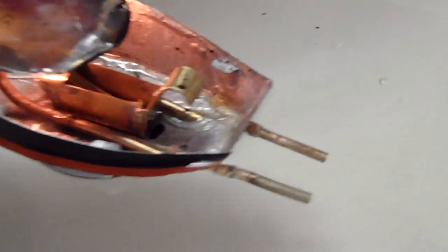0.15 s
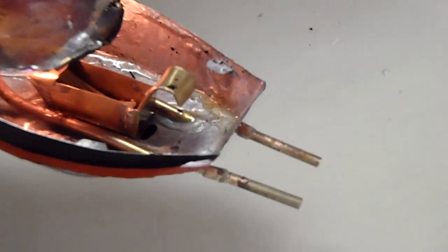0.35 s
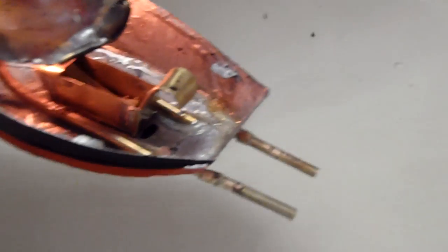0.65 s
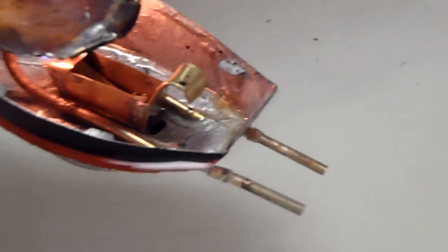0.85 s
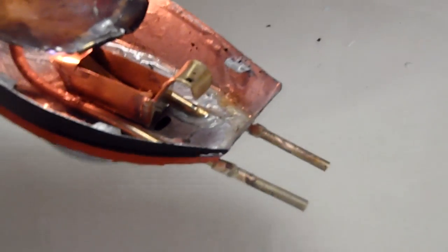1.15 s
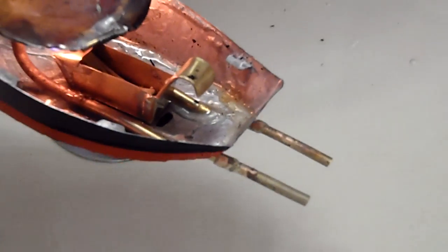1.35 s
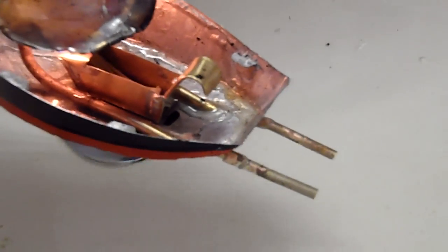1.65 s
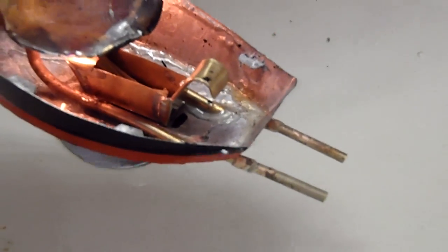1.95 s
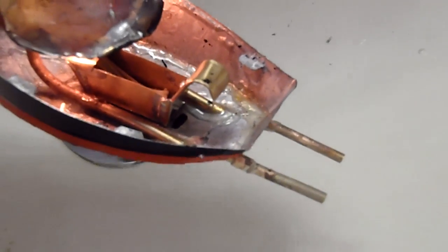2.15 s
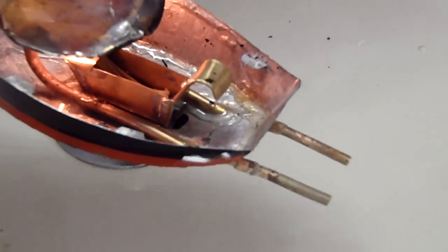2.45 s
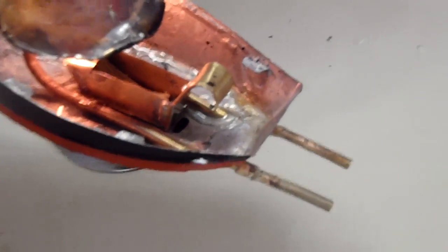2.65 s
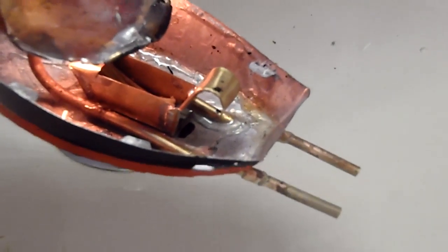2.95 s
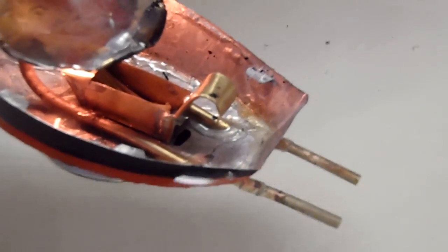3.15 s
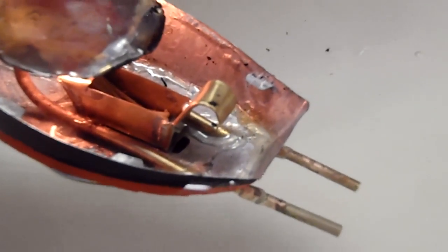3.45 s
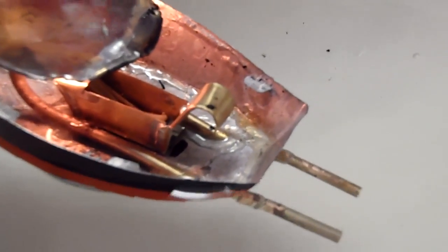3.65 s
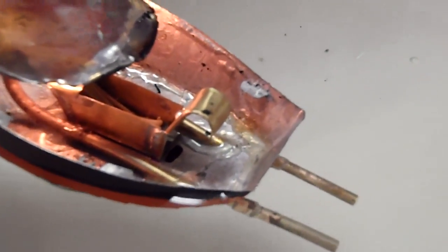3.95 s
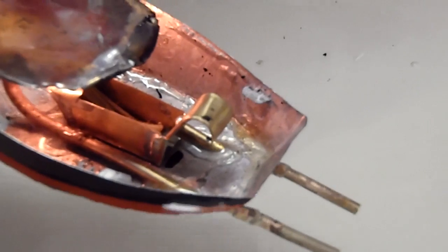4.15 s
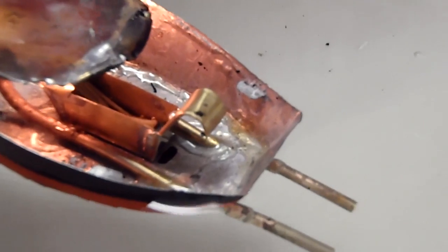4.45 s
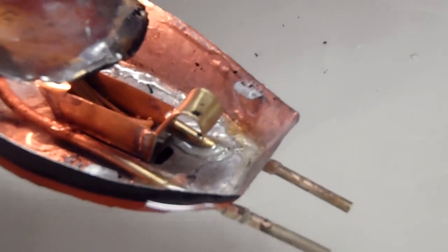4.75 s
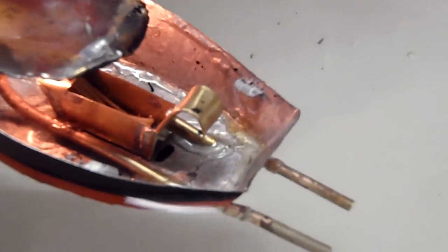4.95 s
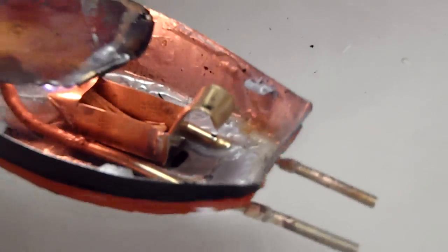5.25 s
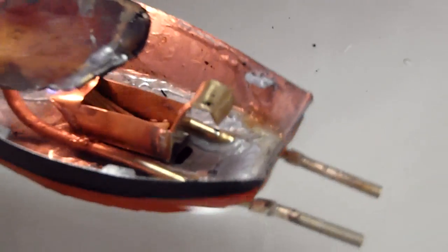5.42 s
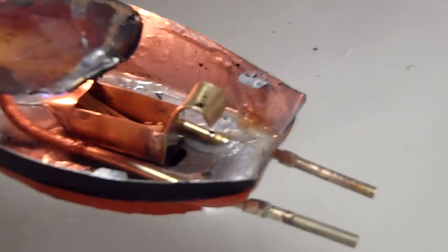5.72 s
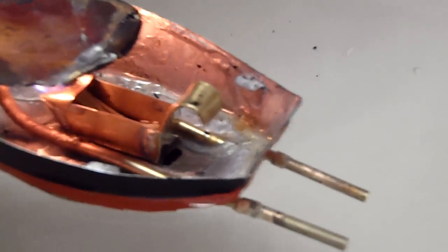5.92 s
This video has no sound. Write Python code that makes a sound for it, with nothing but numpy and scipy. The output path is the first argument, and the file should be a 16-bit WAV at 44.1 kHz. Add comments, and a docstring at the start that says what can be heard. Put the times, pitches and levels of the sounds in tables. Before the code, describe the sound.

Fast, even metallic popping from the boiler of a flame-heated toy boat on water, over a faint hiss.

```python
"""Toy steam boat in a basin

A flame-heated boiler drives a relaxation oscillation, about twelve cycles a second: steam snaps
the thin lid outward (bright), condensation sucks it back (dull). Each snap excites the normal modes
of lid and hull, and the basin reverberates. The timbre shifts as the boat drifts and, near the end,
turns. Two faint thumps and a steady hiss lie beneath."""
import sys
import numpy as np
from scipy import signal
from scipy.fft import rfft, irfft
from scipy.io import wavfile

SR = 44100
rng = np.random.default_rng(int(sys.argv[2]) if len(sys.argv) > 2 else 0)


def store_pcm(level_fs):
    """Save levels as 16-bit WAV."""
    pcm = np.round(np.clip(level_fs, -1, 1) * 32767).astype(np.int16)
    wavfile.write(sys.argv[1], SR, np.atleast_2d(pcm).T)


N = 268285
SIZE, LEAD = 8192, 128  # samples: one snap's transform, its soft run-in
HZ, T = np.fft.rfftfreq(SIZE, 1 / SR), np.arange(SIZE) / SR
SNAP_DB, DRIFT_DB, TURN_DB = (-26.5, -28.5), (0.14, -.5), (0.76, -0.14)  # each (outward, inward)
TURN_S, TURN_TAKES_S = 5.12, 0.065

# Drift of the boat past the listener: t/s, position (about -1 to 1)
POSITION = [(0, -0.95), (1.2, -1.07), (1.7, -0.37), (3.4, 0.11), (4, 0.39), (4.6, 1.1), (5.12, 0.92),
            (5.2, -0.16), (5.7, -0.07), (6.08, -0.94)]
def snaps(s, inward, rattle_db, rattle_t60, shudder_t60):
    """Snap-through buckling: at each time in s the lid flips, an impulse that rings lid and hull."""
    drift = follow(s, POSITION)
    turned = follow(s, [(TURN_S, 0.29), (TURN_S + TURN_TAKES_S, 1)])
    level_db = SNAP_DB[inward] + DRIFT_DB[inward] * drift + TURN_DB[inward] * turned
    level_db += 0.39 * rng.standard_normal((len(s), 1))
    gain = resonances(s, inward, drift, turned) * antiresonances(inward, turned)
    pitch = 1.0043 + 0.0036 * wandering(s, 1, 0.298)  # the hot lid's tension creeps
    gain = np.array([np.interp(HZ / p, HZ, g) for p, g in zip(pitch, gain)])
    blow = shuddering_blow(s, inward, shudder_t60)
    body = minimum_phase(gain / np.hypot(abs(blow), 0.75))  # evens out the blow's colour
    rattle = rng.standard_normal((len(s), SIZE)) * gain_of(-60 * T / rattle_t60)
    attack = dispersion(inward) + gain_of(rattle_db) * unit_spectrum(rattle)
    rings = -irfft(body * blow * attack)
    rings = np.roll(rings, LEAD, axis=1)[:, :SIZE // 2]
    damping_db_per_s = 700 * (0.5 - 0.66 * turned)  # water damps the tail; the turn prolongs it
    rings *= gain_of(-damping_db_per_s * np.maximum(T[:SIZE // 2] - .02, 0))
    rings *= signal.windows.tukey(SIZE // 2, 2 * LEAD / SIZE)
    rings *= gain_of(level_db) / rings[:, LEAD:LEAD + 460].std(1)[:, None]  # rms of the first 10 ms
    out = np.zeros(N)
    for when, ring in zip(s, rings):
        add(out, when - LEAD / SR, ring)
    return out


# Boiler cycle, varying with its heat: t/s, period/ms
PERIOD = [(.06, 84.24), (.23, 84.06), (1.83, 84.87), (2.43, 85.97), (2.77, 85.92), (3.81, 87.25),
          (3.99, 87.01), (4.42, 87.1), (4.85, 86.2), (4.94, 86.36), (5.2, 86.43), (5.37, 88.81),
          (5.55, 87.03), (5.73, 87.89), (5.9, 84.17), (5.98, 84.23)]
# Condensation pulls the lid in: t/s, delay after the outward snap/ms
CONDENSATION = [(0, 39.6), (.25, 38.6), (.9, 38), (1.8, 37.6), (4.2, 37.6), (4.9, 36.8), (5.45, 37.6),
                (5.8, 36.7), (6, 35.7)]
def strokes(first_s=.0591):
    """Relaxation oscillation: boiling and condensation time the outward and inward snaps."""
    outward = [first_s - PERIOD[0][1] / 1000]
    while outward[-1] < N / SR:
        outward.append(outward[-1] + follow(outward[-1:], PERIOD).item() / 1000)
    outward = np.array(outward)
    inward = outward + follow(outward, CONDENSATION)[:, 0] / 1000
    return outward[1:-1], inward[:-2]


# Modes of lid and hull: nominal f/Hz, uncapped t60/s, relative level/dB in four columns
# (outward, inward, outward once turned, inward once turned)
MODES = [ (430.8, 0.054, 5.5, 9.5, 5.5, 8), (537.6, 0.066, 3, 9, 3.5, 7.5), (650, 0.061, 6, 12, 6, 14.5),
         (788, 0.018, 8, 19.5, 10, 11), (896, 0.096, -9, -5, -2, 20), (1036, 0.021, 13.5, 13, 15, 5.5),
         (1080.5, 0.064, 10, 14.5, 21, 18), (1229, 0.013, 17, 5, 13.5, 9), (1527, 0.034, 19, -33, 17, 20),
         (1733, 0.016, 13.5, 9.5, 11, 7), (2066, 0.033, 11.5, 3, 12, -6), (2290, 0.094, 9.5, -15, 9, -3),
         (2400, 0.055, 13, 1, -9, -10), (2535, 0.025, 7.5, 7, 9.5, 2), (2820, 0.064, 13, -34, 3, -17),
         (2996, 0.013, 13, -3, 9, -12), (3286, 0.054, -72, -12.5, 16, -3),
         (3594, 0.0076, 11.5, -7.5, 8, -28), (3836, 0.069, 8.5, -6.5, -5, -11),
         (3979, 0.042, 7.5, -25, 14.5, -37), (4130, 0.062, -15.5, -61, -10, -2),
         (4323, 0.042, 4.5, -6, 14.5, -16), (4504, 0.069, 4, -8, 0, -4.5), (4694, 0.012, 7, -4, 7.5, -22),
         (4934, 0.016, 11.5, -22, 3, -13), (5250, 0.067, -21, -14, 4, -17),
         (5750, 0.067, -11.5, -26, -5.5, -28), (6830, 0.0034, -22.5, -39, -23, -36)]
# Cap that the wet hull sets on modal decay time: f/Hz, nominal t60/s
T60_CAP = [(1200, .075), (1600, .036), (5000, .03)]
def resonances(s, inward, drift, turned):
    """Modal superposition: resonance peaks add in power, each as wide as its damping makes it."""
    modes = np.transpose(MODES)
    f, t60 = modes[:2]
    mode_db = (1 - turned) * modes[2 + inward] + turned * modes[4 + inward]
    mode_db += modal_shading(s, f, inward, drift, turned)
    t60 = np.minimum(t60, read(f, T60_CAP))
    half_width = np.log(1000) / (2 * np.pi * t60[:, None])
    detune = ((HZ - f[:, None]) / half_width) ** 2
    gain = np.sqrt(gain_of(2 * mode_db) @ (1 / (1 + detune + 0.023 * detune ** 2)))
    gain /= 1 + (HZ / 8000) ** 6  # each snap's treble rolls off above 8 kHz
    return gain / (1 + (330 / (HZ + 1)) ** 4)  # the bass below 330 Hz falls away steeply


# Modal gain per unit of drift: f/Hz, outward level/dB, inward level/dB
DRIFT_SHADING = [(710, -0.5, -1.5), (990, 2.5, 0), (1240, 0.5, -1.5), (1720, 1, -3), (2080, -1.5, -6),
                 (2250, -8, 15), (2380, 8, -3), (2420, 2, 5), (2969, 4.5, -6.5), (3020, -4, 4.5),
                 (3496, -4, -8.5), (3967, 10, 8), (3974, -1, 1), (4150, 1, 0), (4310, 0.5, -3.5),
                 (4850, 1.5, -2.5)]
# Swell of the modes above 2.3 kHz: t/s, level/dB before weighting
TREBLE_SWELL = [(0, 1.5), (.2, 1.7), (.48, -3), (.75, 1), (1.2, 0), (1.8, 1.9), (2.05, 1.7), (2.3, 1.5),
                (4.4, 0.3), (5.15, -0.3), (5.35, 0), (5.85, 0), (6.08, 1)]
# Swell of the modes near 2 kHz: t/s, outward level/dB, inward level/dB
MID_SWELL = [(0, 1, 2), (.4, 2, -10.5), (1.7, 0.7, -2.3), (5.1, 2.1, -.6), (5.5, 0, 3), (5.8, 5, 1.1),
             (6.08, 5.5, 9.5)]
def modal_shading(s, f, inward, drift, turned):
    """Amplitude modulation, in dB: the modes follow the drift, swell and waver, high ones most."""
    drift_db = drift * read(f, DRIFT_SHADING, 1 + inward)
    treble_db = follow(s, TREBLE_SWELL) * (f > 2300) * 1.66 ** inward * 1.36 ** (f > 4600)
    mid_db = follow(s, MID_SWELL, 1 + inward) * (abs(f - 1900) < 250)
    waver_db = 1.6 * (f / 3000) ** .6 * (1 + turned / 2) * wandering(s, len(f), 0.3056)
    return drift_db + treble_db + mid_db + waver_db


# Notches between modes: nominal f/Hz, half-width/Hz, depth/dB in the four columns of MODES
NOTCHES = [(857, 34.3, 16.6, 22, 17, 4), (2243, 66, 22, -4.5, -3, 3), (2955, 25, 19, 10, -3.5, 2),
           (3285, 108, 15.3, 5, 12, 9), (2003, 51, 1.14, 13, -6, 36), (1414, 125, 0.83, -12, -1.5, 17.5),
           (2768, 53, 18, 36, -12.5, 11)]
def antiresonances(inward, turned):
    """Interference: neighbouring modes cancel in notches; a negative depth reinforces."""
    notches = np.transpose(NOTCHES)
    depth_db = (1 - turned) * notches[2 + inward] + turned * notches[4 + inward]
    detune = ((HZ - notches[0][:, None]) / notches[1][:, None]) ** 2
    return gain_of(-depth_db @ (1 / (1 + detune)))


# Shudder relative to the first push: f/Hz, outward level/dB, inward level/dB
SHUDDER_LEVEL = [(470, -3.5, -4.5), (756, 1, 0.5), (1020, -10, -3.5), (1640, -12.5, 1.5), (2370, 6, -0.5),
                 (3180, 5.5, 16.5), (3580, -6, 2), (4970, 0.5, 10)]
def shuddering_blow(s, inward, t60):
    """Excitation spectrum: an impulse plus a decaying shudder that spreads the force in time."""
    shudder = wandering(s, SIZE, 1.31) * gain_of(-60 * T / t60) * np.clip(T / 0.002, 0, 1) ** 2
    return 1 + gain_of(read(HZ, SHUDDER_LEVEL, 1 + inward)) * unit_spectrum(shudder)


# Lag behind the first push: f/Hz, outward delay/ms, inward delay/ms
GROUP_DELAY = [(500, 0.12, 0.11), (1030, 0.066, 0.16), (1520, 0.36, 0.44), (2120, 0.67, 1.17),
               (2540, 0.33, 3.29), (3720, 1.21, 2.66), (5130, 1.36, 2.27)]
def dispersion(inward):
    """Group delay, integrated to phase: the upper modes speak late."""
    phase = 2 * np.pi * np.cumsum(read(HZ, GROUP_DELAY, 1 + inward)) / 1000 * SR / SIZE
    return np.exp(-1j * phase)


# Reverberation time of the basin: f/Hz, t60/s
BASIN_T60 = [(300, 0.23), (1000, 0.13), (2500, 0.13), (5000, 0.18)]
def basin(x, build_s=0.0067):
    """Reverberation: dense reflections off walls and water, each band dying at its own rate."""
    hz, t, bands = signal.stft(rng.standard_normal(SR // 2), SR, nperseg=256)
    bands *= gain_of(-60 * t / read(hz, BASIN_T60)[:, None])
    tail = signal.istft(bands, SR, nperseg=256)[1]
    tail *= np.clip(np.arange(len(tail)) / SR / build_s, 0, 1) ** 2
    return signal.fftconvolve(x, tail / np.linalg.norm(tail))[:N]


# Faint low bumps: t/s, peak level/dB, f/Hz
BUMPS = [(2.663, -40, 201), (4.421, -36.5, 262)]
def thumps():
    """Gaussian tone pulses: about one cycle each, too short to carry a clear pitch."""
    out = np.zeros(N)
    for s, db, hz in BUMPS:
        cycles = np.arange(-.01, .01, 1 / SR) * hz
        add(out, s - .01, gain_of(db) * np.cos(2 * np.pi * cycles) * np.exp(-(cycles / 0.4) ** 2))
    return out


# Room tone and hiss: f/Hz, relative spectral level/dB
HISS_SPECTRUM = [(20, -0.5), (50, 6), (130, 7.5), (220, 11), (400, 9), (1500, 9), (4500, 0.5), (6200, 0.5),
                 (9000, -1), (15000, -2)]
def hiss(level_db=-51.5):
    """Stationary noise: white noise coloured by a spectral envelope."""
    colour = gain_of(read(np.fft.rfftfreq(N, 1 / SR), HISS_SPECTRUM))
    noise = irfft(rfft(rng.standard_normal(N)) * colour, N)
    return gain_of(level_db) * noise / noise.std()


def minimum_phase(gain):
    """Causality: the spectrum with this gain that rings only after the blow."""
    cepstrum = irfft(np.log(gain + 1e-9))
    cepstrum[:, 1:SIZE // 2] *= 2
    cepstrum[:, SIZE // 2 + 1:] = 0
    return np.exp(rfft(cepstrum))


def unit_spectrum(x):
    """Spectrum of each row at unit energy."""
    return rfft(x / np.linalg.norm(x, axis=1)[:, None])


def wandering(s, count, period_s):
    """Slowly varying random values of unit variance, one row a snap."""
    knots = rng.standard_normal((int(N / SR / period_s) + 2, count))
    k = (s // period_s).astype(int)
    angle = (s % period_s / period_s * np.pi / 2)[:, None]
    return np.cos(angle) * knots[k] + np.sin(angle) * knots[k + 1]


def follow(s, table, column=1):
    """Linear interpolation in time, one row a snap."""
    columns = np.transpose(table)
    return np.interp(s, columns[0], columns[column])[:, None]


def read(hz, table, column=1):
    """Linear interpolation in log frequency."""
    columns = np.transpose(table)
    return np.interp(np.log(hz + 1), np.log(columns[0] + 1), columns[column])


def gain_of(db):
    """Decibels to amplitude."""
    return 10 ** (np.asarray(db) / 20)


def add(mix, s, sound):
    """Superposes a sound at a time in seconds."""
    part = mix[round(s * SR):][:len(sound)]
    part += sound[:len(part)]


def scene():
    """Superposition of direct snaps, their reflections and the background."""
    outward_s, inward_s = strokes()
    outward = snaps(outward_s, inward=0, rattle_db=-15.5, rattle_t60=0.018, shudder_t60=0.022)
    inward = snaps(inward_s, inward=1, rattle_db=-21, rattle_t60=0.016, shudder_t60=0.024)
    angle = np.arange(N) / SR * np.pi / 1.183  # echo paths crossfade as the boat drifts
    reflections = sum(basin(gain_of(-12) * direct * share)
                      for direct in (outward, inward) for share in (np.cos(angle), np.sin(angle)))
    return (outward + inward + reflections + thumps() + hiss())[None]


def record(dry):
    """Band limiting: a linear-phase low-pass at 14.3 kHz."""
    lowpass = signal.firwin(767, 14300, window=("kaiser", 9), fs=SR)
    return signal.oaconvolve(dry, lowpass[None], "same")


dry = scene()
out = record(dry)
store_pcm(out)
```